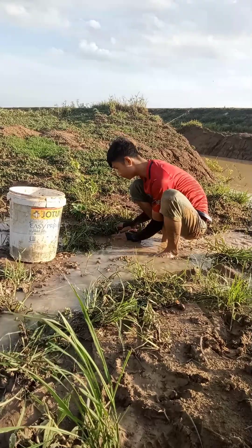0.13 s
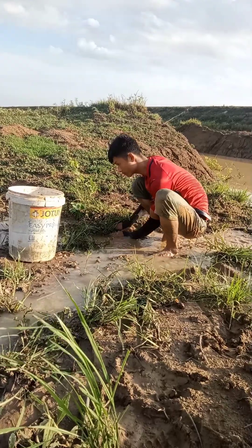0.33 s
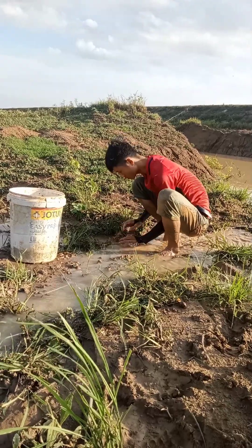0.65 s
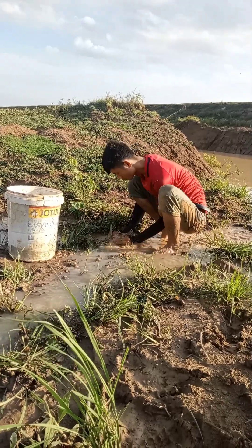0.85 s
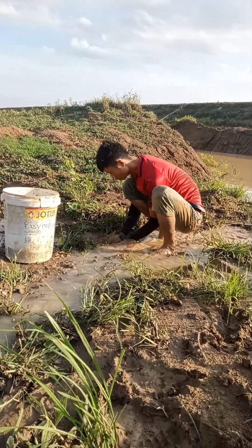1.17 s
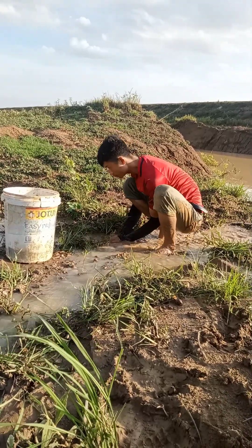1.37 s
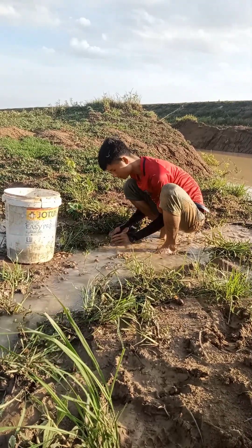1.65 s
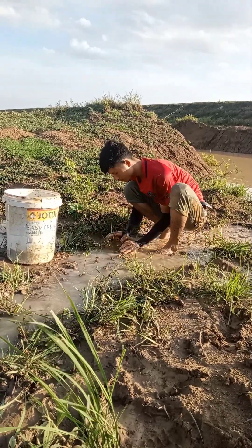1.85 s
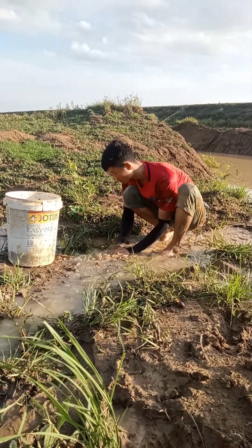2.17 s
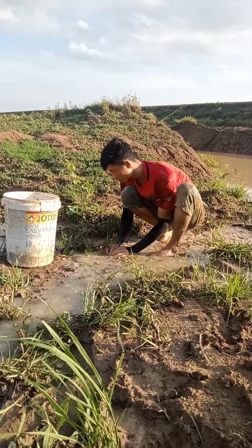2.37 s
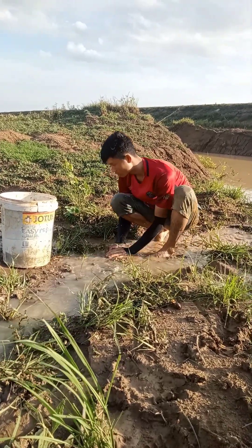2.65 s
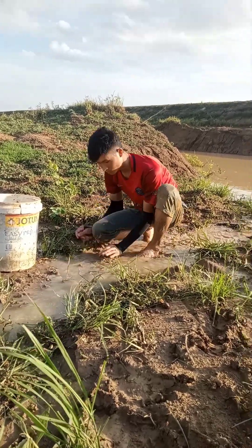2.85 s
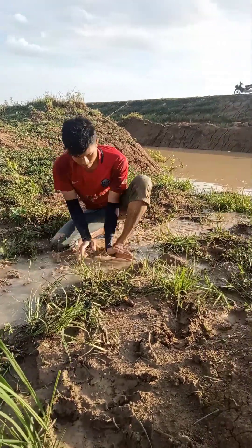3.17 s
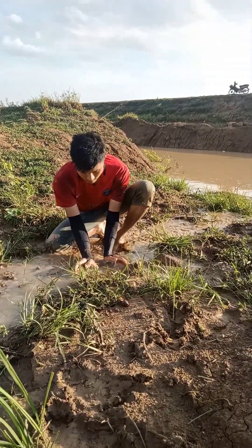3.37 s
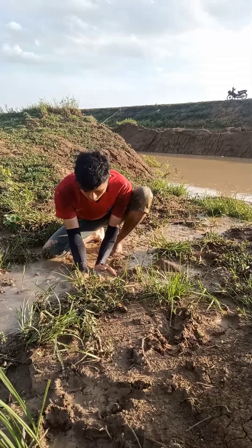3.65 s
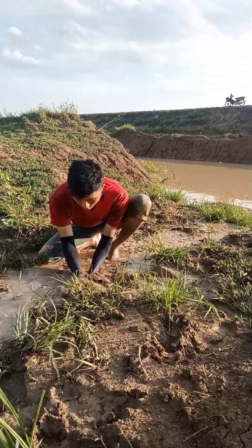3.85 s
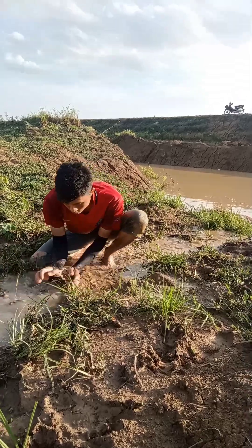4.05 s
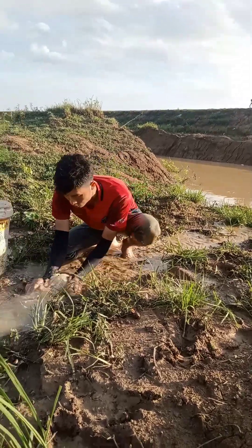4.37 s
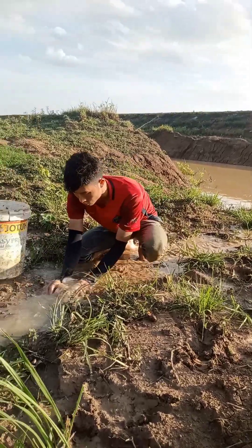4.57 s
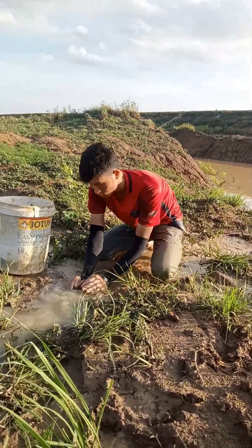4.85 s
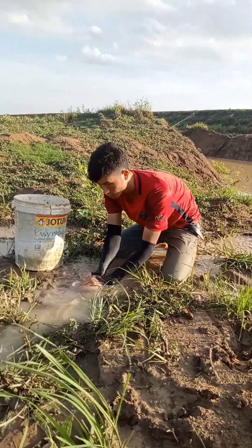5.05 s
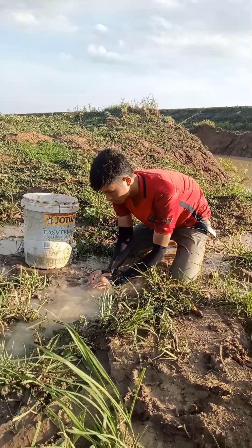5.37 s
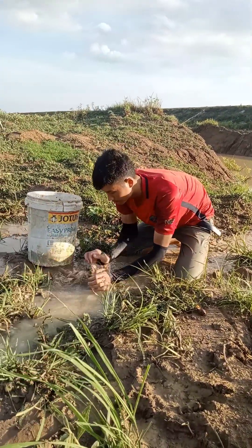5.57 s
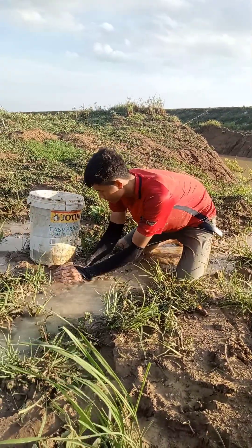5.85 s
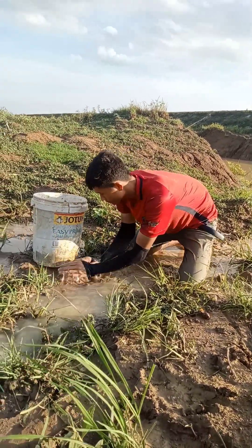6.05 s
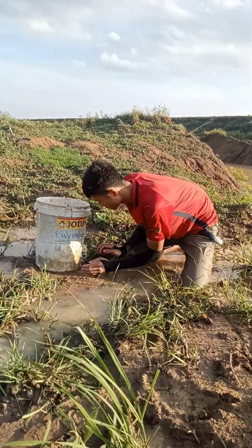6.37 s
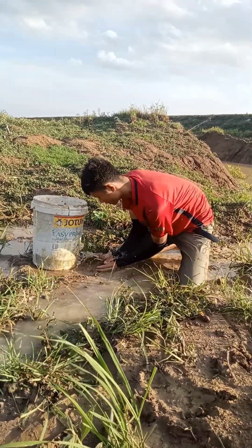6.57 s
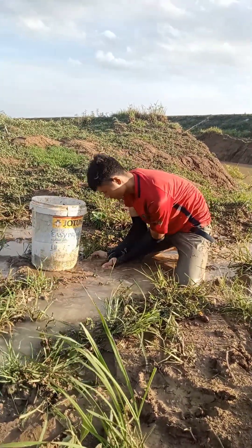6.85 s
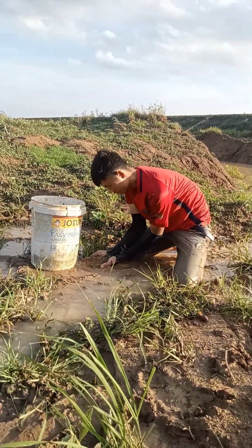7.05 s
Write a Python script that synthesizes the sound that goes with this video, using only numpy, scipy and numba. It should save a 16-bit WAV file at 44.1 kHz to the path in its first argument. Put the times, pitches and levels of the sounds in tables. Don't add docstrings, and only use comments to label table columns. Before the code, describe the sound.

Hands slosh and scoop shallow muddy water with plinking drops and small slaps while gusts of wind thump against a bare microphone outdoors.

```python
import sys
import numpy as np
from scipy import signal
from scipy.fft import rfft, irfft, next_fast_len
from scipy.io import wavfile
from scipy.ndimage import uniform_filter1d, minimum_filter1d
from numba import njit

SR = 44100
rng = np.random.default_rng(int(sys.argv[2]) if len(sys.argv) > 2 else 0)


def master(y):
    cut = np.clip(np.atleast_2d(y).T, -1, 1)
    pcm = np.round(cut * 32767)
    wavfile.write(sys.argv[1], SR, pcm.astype(np.int16))


def invert_db(level):
    return 10 ** (np.asarray(level, dtype=float) / 20)


N = 318381


def level(x, db):
    return x * invert_db(db) / np.sqrt(np.mean(x ** 2))


def columns(table):
    return np.ascontiguousarray(np.transpose(table), float)


def curve(table):
    s, *values = np.transpose(table)
    return [np.interp(np.arange(N) / SR, s, v) for v in values]


def colour(x, table):
    hz, db = np.transpose(table)
    size = next_fast_len(N)
    f = np.arange(size // 2 + 1) * SR / size + 1
    gain = invert_db(np.interp(np.log(f), np.log(hz), db))
    return irfft(rfft(x, size) * gain, size)[:N]


def walk(rate_hz):
    hold = int(SR / rate_hz)
    steps = np.repeat(rng.standard_normal(N // hold + 1), hold)[:N]
    return uniform_filter1d(steps, hold) * np.sqrt(1.5)


def random_phase(count):
    return 2 * np.pi * rng.random(count)


@njit
def grains(s, hz, size, rise, fall, bend, glide, phase):
    y = np.zeros(N)
    for k in range(len(s)):
        first = max(int((s[k] - 3 * rise[k]) * SR), 0)
        last = min(int((s[k] + 7 ** (1 / bend) * fall[k]) * SR), N)
        for i in range(first, last):
            t = i / SR - s[k]
            e = (t / rise[k]) ** 2 if t < 0 else (t / fall[k]) ** bend
            angle = phase[k] + 2 * np.pi * hz[k] * t * (1 + glide[k] * t / 2)
            y[i] += size[k] * np.exp(-e) * np.sin(angle)
    return y


def lumps(s, db, rise_s, fall_s, bend=1.1):
    zero = 0 * s
    return grains(s, zero, invert_db(db), rise_s + zero, fall_s + zero, bend, zero, np.pi / 2 + zero)


def swarm(count, lo_hz, hi_hz, cycles, spread_db, glide, bend=0.56):
    when, pitch, length, rarity, slide, turn = rng.random((count, 6)).T
    hz = lo_hz * (hi_hz / lo_hz) ** pitch
    fall = cycles * (.5 + length) / hz
    rise = fall if bend > 1 else fall / 3
    size = invert_db(-spread_db * np.log(rarity + 0.0048)) * np.sqrt(hz)
    y = grains(when * N / SR, hz, size, rise, fall, bend, glide * slide / fall, 2 * np.pi * turn)
    return level(y, 0)


def split(x):
    # f/Hz, density/dB
    water = [(600, -9), (900, -7), (1300, -9.5), (2000, -1.5), (2500, -3.5), (3050, 2.5), (3700, -1),
             (4800, -14.5), (6000, -18.5), (7100, -17), (8100, -18.5), (9400, -11.5), (11500, -21),
             (15500, -26), (16000, -70)]
    mix = colour(x, water)
    body = colour(mix, [(4500, 1.0), (5500, -88)])
    return level(body, 0), level(mix - body, 0)


def insect():
    buzz = (.335, .145, 8150, -62.5)
    end_s, length_s, hz, db = buzz
    period_s = .29
    t = np.arange(N) / SR
    left_s = (end_s - t) % period_s
    gate = np.clip(np.minimum(left_s, length_s - left_s) * 100, 0, 1) * (t < end_s)
    return invert_db(db) * gate * (1.2 + walk(700)) * np.sin(2 * np.pi * hz * t)


def wind_bed(gust_db):
    slow = swarm(count=1500, lo_hz=37.0, hi_hz=217, cycles=0.68, spread_db=2.5, glide=0.038, bend=1.64)
    slow = colour(slow, [(30, -50), (60, -8.0), (100, 4.5), (300, -8.0)])
    fast = swarm(count=2500, lo_hz=158.0, hi_hz=890, cycles=0.56, spread_db=3.5, glide=0.073, bend=1.1)
    fast = colour(fast, [(150, -2.5), (350, -14.0), (900, -59), (1500, -54)])
    mix = level(slow, -1.7) + level(fast, -8) * invert_db(1.02 * (gust_db + 27))
    return invert_db(gust_db + 2.0 * walk(28)) * mix


def ripples():
    # t/s, level/dB, f/Hz
    small = [(0.111, -28.0, 129), (0.706, -24, 149), (0.733, -23.5, 140), (0.922, -25.0, 170),
             (1.068, -21, 140), (1.379, -26, 139), (1.427, -28, 119), (1.492, -22, 109), (1.606, -31, 120),
             (1.696, -23, 150), (1.745, -20, 150), (1.762, -17, 160), (1.782, -34, 120),
             (1.919, -22.5, 130), (1.942, -22, 130), (1.97, -15.5, 150), (2.035, -19, 150),
             (2.058, -16.5, 171), (2.087, -23, 140), (2.137, -21, 180), (2.18, -19, 160), (2.299, -20, 160),
             (2.315, -24.0, 140), (2.334, -14.5, 140), (2.373, -18, 130), (2.389, -18.0, 170),
             (2.437, -23, 140), (2.454, -16.5, 170), (2.573, -5, 212), (2.59, -10, 180),
             (2.685, -26.0, 130), (2.714, -28, 180), (3.429, -34, 110), (3.473, -28, 120),
             (3.517, -24, 130), (3.683, -26, 130), (3.782, -20, 130), (3.817, -23, 119),
             (3.868, -19.5, 118), (3.892, -31, 130), (4.039, -19, 140), (4.092, -21, 159),
             (4.378, -22, 130), (4.519, -29.0, 170), (4.633, -22, 120), (4.701, -29.5, 190),
             (4.742, -25.5, 129), (5.111, -11, 157), (5.152, -21, 140), (5.495, -19.5, 170),
             (5.602, -29, 110), (5.662, -9, 180), (5.713, -17, 160), (5.803, -18.5, 130), (5.873, -12, 140),
             (6.319, -29, 150), (6.749, -29, 160), (7.052, -23, 150)]
    s, db, hz = columns(small)
    rise = 0.8 / hz
    return grains(s, hz, invert_db(db), rise, 1.14 * rise, 2.2, 0 * s, random_phase(len(s)))


def snaps():
    # t/s, level/dB, f/Hz
    fronts = [(1.1966, -25.0, 460), (1.4002, -24.5, 444), (1.5845, -28.5, 530), (1.6302, -22, 510),
              (1.6629, -23, 476), (1.7268, -22, 420), (1.8437, -28, 500), (2.0635, -31, 480),
              (2.2139, -17.5, 477), (2.2262, -14.5, 456), (2.2782, -29.5, 480), (2.3332, -26, 460),
              (2.3479, -27, 470), (2.3565, -22, 490), (2.3867, -28, 510), (2.4552, -29.0, 470),
              (2.5163, -16, 460), (2.5254, -22, 470), (2.539, -13, 590), (2.5657, -10, 560),
              (2.5789, -18, 490), (2.6114, -20.5, 480), (4.1699, -26, 466), (4.211, -28.5, 570),
              (4.2378, -22, 480), (4.4088, -29.5, 580), (4.5673, -27, 494), (5.129, -25.0, 510),
              (5.5172, -29, 520), (5.5537, -32, 450), (5.6193, -25.5, 480), (5.6289, -25.0, 500),
              (5.6516, -27.0, 480), (5.6836, -17.5, 540), (1.0465, -23, 410), (5.8663, -20.0, 487),
              (5.8888, -24, 460), (5.9014, -31, 530), (5.9093, -19.5, 577), (5.9194, -23, 464),
              (6.0286, -29.5, 510), (6.0771, -24, 480), (6.2434, -23.5, 480), (6.4006, -28.5, 470),
              (6.5118, -24, 540), (6.523, -17.5, 480), (6.5322, -22.5, 490), (6.5459, -28, 530),
              (6.7311, -27.5, 465), (7.1587, -18, 457), (7.1983, -24, 460)]
    s, db, hz = columns(fronts)
    return grains(s, 0.86 * hz, invert_db(db + 4), 0.54 / hz, 1 / hz, 1.67, -.08 * hz, random_phase(len(s)))


def eddies(gust_db, churn):
    # t/s, level/dB,
    # f/Hz, length/ms
    big_eddies = [(.113, -29.5, 121, 18), (.45, -34, 100, 27), (.706, -20.5, 140, 18), (.811, -25, 139, 31),
                  (.905, -14.5, 205, 10.6), (1.04, -16, 163, 20), (1.131, -11.5, 172, 6.7),
                  (1.195, -13, 171, 18), (1.344, -17, 210, 5.1), (1.401, -14, 138, 40),
                  (1.491, -21.5, 103, 9.5), (1.574, -17.5, 155, 24), (1.632, -11.5, 202, 16),
                  (1.668, -14.5, 141, 22), (1.728, -11.5, 199, 9.3), (1.896, -16, 133, 51),
                  (1.969, -26, 142, 15), (2.005, -18, 169, 21), (2.059, -15, 177, 24),
                  (2.181, -19.5, 170, 20), (2.211, -9.5, 198, 7.2), (2.23, -9.5, 192, 10),
                  (2.278, -17, 242, 8.6), (2.351, -8, 188, 21), (2.414, -12.5, 190, 10),
                  (2.454, -15, 168, 7.6), (2.547, -10, 207, 16), (2.573, -8, 221, 12),
                  (2.611, -15, 245, 28), (2.517, -14.5, 208, 14),
                  (2.671, -25.5, 214, 39), (2.771, -27, 194, 20), (1.263, -21, 133, 16),
                   (2.885, -33, 230, 15), (1.855, -16, 150, 6.4), (2.389, -17.5, 183, 5.4),
                   (4.377, -19.5, 121, 18), (1.212, -14.5, 208, 13), (5.1, -16.5, 148, 22),
                   (3.32, -41, 121, 33), (3.428, -34, 106, 13), (3.993, -28, 161, 15),
                   (2.96, -30.5, 124, 8.1), (3.195, -25.5, 107, 16), (3.53, -24.5, 105, 35),
                   (3.645, -28, 150, 9.9), (3.782, -22, 126, 15), (3.869, -27, 117, 7.8),
                   (4.056, -20, 134, 35), (4.172, -16.5, 182, 15), (4.246, -13, 179, 38),
                   (4.319, -13.5, 162, 21), (4.411, -19, 134, 17), (4.568, -12, 195, 7),
                   (4.675, -22, 145, 15), (4.74, -21.5, 116, 15), (5.131, -10.5, 158, 20),
                  (5.34, -18, 122, 16), (5.395, -19.5, 143, 42), (5.516, -13.5, 265, 20),
                 (5.559, -17.5, 190, 16), (5.621, -14.5, 173, 7.9), (5.661, -10, 168, 18),
                 (5.686, -6, 170, 16), (5.764, -11, 141, 14), (5.841, -17.5, 201, 25),
                 (5.889, -13, 217, 7.2), (5.911, -8.5, 238, 28.5), (6.031, -16.5, 178, 5.1),
                 (6.084, -13.5, 164, 19), (6.227, -10.5, 173, 24), (6.258, -10.5, 110, 10),
                 (6.305, -16.5, 139, 9.8), (6.403, -16, 198, 22), (6.439, -21, 125, 18),
                 (6.523, -12, 203, 17.3), (6.54, -12.5, 140, 22), (6.564, -22, 171, 24),
                 (6.733, -22.5, 203, 14), (6.766, -19, 132, 15), (6.804, -17, 116, 40),
                 (6.828, -18, 178, 8.6), (6.931, -19, 137, 10.3), (7.069, -16, 179, 4.8),
                 (7.16, -11, 170, 11), (7.205, -17, 230, 24)]
    s, db, hz, ms = columns(big_eddies)
    half = np.clip(ms, 6, 40) * 0.00051
    core = np.minimum(half, 1.04 / hz)
    slide, turn, lag, wake_turn, scatter = rng.random((len(s), 5)).T
    thump = grains(s, hz, invert_db(db), core, 1.3 * core, 3.4, (slide - .5) * .5 / core, 2 * np.pi * turn)
    wake = grains(s + lag * half, hz * .55, invert_db(db - 10), 1.6 * core, 2.2 * core, 2., 0 * s,
                  2 * np.pi * wake_turn)
    swirl = churn * lumps(s, db - 8.5, 1.86 * half, 1.4 * half)
    flutter_db = -17.5 + 12 * np.log2(hz / 160) + (scatter - .5)
    flutter_db = flutter_db + 0.41 * (gust_db[(s * SR).astype(int)] + 30.5)
    flutter = colour(rng.standard_normal(N),
                     [(180, -21.0), (320, 4.5), (600, -16.0), (900, -32.0), (1300, -69)])
    edge = level(flutter, 0) * lumps(s, db + flutter_db, 1.61 * half, 1.1 * half)
    return thump + wake + swirl + edge


def wind():
    # t/s, level/dB
    gusts = [(0, -58), (.25, -47), (.57, -62), (.72, -36.5), (1.15, -28.5), (2.44, -26), (2.56, -22),
             (2.72, -33.5), (3.0, -48.5), (3.26, -36), (4.08, -32.5), (4.25, -25.5), (4.67, -31),
             (4.9, -49), (5.27, -38.5), (5.64, -24), (6.05, -34), (7.22, -34)]
    gust_db, = curve(gusts)
    churn = colour(rng.standard_normal(N),
                   [(30, -19.5), (80, 7.0), (170, 2.0), (300, -2.0), (500, -47.0)])
    churn = level(churn, 0)
    floor = invert_db(-58) * colour(churn, [(100, 0), (190, -16)])
    flow = wind_bed(gust_db) + floor + eddies(gust_db, churn) + snaps() + ripples()
    return colour(flow, [(25, -11), (55, 0.5), (1100, 1.5), (1800, -50)])


def ticks():
    # t/s, level/dB, f/Hz
    bursts = [(0.1874, -31, 10300), (5.184, -37, 4600), (0.4625, -38, 6000), (0.4841, -37, 8800),
              (1.0289, -37, 7000), (1.2382, -37, 9300), (1.2606, -38, 9500), (1.3412, -27, 12000),
              (1.3828, -37, 9500), (1.4435, -37, 9600), (1.7208, -37, 8700), (2.0079, -34, 11100),
              (2.075, -37, 7300), (2.1351, -37, 6460), (2.1795, -35, 8200), (3.0007, -40, 9200),
              (3.0251, -40, 9500), (3.0843, -40, 6700), (3.2151, -36.5, 9900), (3.2356, -26.0, 10700),
              (3.2568, -27, 10000), (3.2634, -35, 9900), (3.3196, -38, 8600), (3.375, -35, 5950),
              (3.4501, -38.0, 8600), (3.4731, -37, 8300), (3.4892, -27, 11400), (3.6717, -35, 9700),
              (4.177, -36, 11500), (3.9789, -38, 9900), (4.1255, -32, 7350), (4.1775, -35, 5300),
              (4.547, -36, 10000), (4.2382, -35, 9100), (4.2509, -41, 6100), (4.3536, -31.5, 8400),
              (4.4204, -36, 8160), (4.9482, -25.5, 10200), (5.008, -38, 9600), (5.0318, -38.0, 7700),
              (5.0643, -35, 9100), (5.1301, -38.5, 8800), (5.326, -37, 5600), (5.6493, -33, 8900),
              (5.7534, -30, 8950), (6.2691, -32, 9350), (6.4402, -35.0, 6300), (6.5094, -28.5, 9200),
              (6.5207, -37, 9600), (6.5949, -34, 8460), (6.6379, -35, 8500), (7.0017, -31, 9000)]
    s, db, hz = columns(bursts)
    fall = 6 / hz
    ring = grains(s, hz, invert_db(db - 0.4), 0.27 * fall, fall, 1.1, 0 * s, random_phase(len(s)))
    _, spray = split(rng.standard_normal(N))
    return ring + spray * lumps(s, db - 13, .0006, .0018, bend=.9)


def drops():
    # t/s, level/dB, f/Hz, spray/dB
    single = [(0.4065, -38, 1500, -23), (0.644, -29.5, 2900, -35.5), (0.8554, -5.5, 3130, -36),
              (0.942, -34, 1600, -23), (1.0578, -27, 3020, -24), (1.3112, -34, 2760, -14),
              (1.4208, -25.5, 2860, -25), (1.628, -32, 3430, -27), (1.9457, -20, 5200, -17),
              (2.3224, -35.5, 2820, -28), (3.0105, -26, 2280, -32), (3.0825, -29.5, 2190, -23),
              (3.2536, -21.5, 3500, -29), (3.2686, -26, 3030, -22), (3.567, -26, 3070, -37),
              (4.1182, -26.5, 3830, -29), (4.3547, -20, 2060, -26), (4.409, -29.5, 2700, -20),
              (4.5199, -25.5, 2220, -31), (4.6297, -31.5, 2200, -27), (4.946, -27.5, 4000, -14),
              (4.9608, -31, 3500, -10), (5.583, -22.5, 2460, -26), (5.7585, -19.5, 3920, -19),
              (5.776, -20, 2980, -43), (5.8535, -30, 1540, -19), (5.911, -28, 3060, -30),
              (6.5127, -26.5, 4050, -24), (6.894, -26.5, 2950, -22), (7.0683, -36, 1830, -24)]
    # t/s, level/dB, length/ms, spray/dB
    splashes = [(.19, -44, 9.4, -1.5), (0.841, -37, 12, -11), (0.859, -48.5, 4.7, 16.5),
                (1.942, -33, 7, -1), (1.965, -37.5, 15, -14), (2.96, -46, 18, -3), (5.03, -45, 21, -3),
                (3.02, -38.5, 47, -4.5), (3.257, -37.5, 41, -5), (3.465, -40, 20, -5), (4.122, -38, 16, -6),
                (4.369, -32, 21, -11), (4.955, -33, 12, -4.5), (5.755, -31, 14, -1.5),
                (6.519, -35.5, 22, -10), (4.089, -39, 5, -3), (3.995, -36.5, 24, -11),
                (3.4255, -37, 4.5, -8)]
    s, db, hz, spray_db = columns(single)
    fall = 4.5 / hz
    slide, turn = rng.random((len(s), 2)).T
    ring = grains(s, hz, invert_db(db + 2.5), .35 * fall, 1.2 * fall, 1.25, .015 * slide / fall,
                  2 * np.pi * turn)
    tail = lumps(s + 0.0039, db - 14.5, 0.0015, 0.0032, bend=1.)
    mist = lumps(s, db + spray_db + 4, .0007, .0016, bend=1.)

    s, db, ms, spray_db = columns(splashes)
    half = np.clip(ms, 4, 40) / 1000
    ragged = level(invert_db(3.6 * walk(250)), 0)
    tail = tail + ragged * lumps(s, db, 0.95 * half, half, bend=0.71)
    mist = mist + ragged * lumps(s, db + spray_db, 0.61 * half, 0.75 * half, bend=0.85)

    body, spray = split(rng.standard_normal(N) * invert_db(2.6 * walk(600)))
    return ring + tail * body + mist * spray


def plops():
    # t/s, level/dB, f/Hz
    gulps = [(.293, -39, 550), (.476, -37, 630), (.569, -34, 825), (.729, -32.5, 1040), (2.157, -23.5, 495),
             (2.998, -35, 1030), (3.068, -31, 765), (3.794, -30, 917), (4.516, -30.5, 715),
             (5.586, -26, 1080), (5.882, -33, 1500), (5.0738, -29, 3530), (5.715, -37, 1700),
             (5.848, -29, 3650), (5.866, -34, 1550), (3.945, -37, 1800), (3.847, -36, 840),
             (1.963, -31, 2200), (6.867, -24, 562), (6.912, -35, 1000), (6.964, -32, 560), (6.71, -33, 560),
             (5.41, -37, 1060), (6.905, -36, 1490), (7.066, -32, 980)]
    s, db, hz = columns(gulps)
    fall = 3.3 / hz
    return grains(s, hz, invert_db(db), .35 * fall, fall, 1.3, .06 / fall, 0 * s)


def slaps():
    # t/s, level/dB, centre f/Hz
    hits = [(4.2529, -21, 2770), (0.85, -29, 1300), (7.068, -31, 1210), (1.42, -26, 2600),
            (1.9415, -16, 3020), (1.945, -11.5, 4270), (1.9465, -20, 3600), (3.9778, -32, 3600),
            (3.065, -23, 1230), (4.4196, -25, 3220), (6.56, -24, 3020), (4.3535, -13, 2000),
            (4.518, -31, 1170), (5.389, -28, 3330), (5.582, -21, 1520), (5.632, -24.5, 2400),
            (5.662, -26.5, 2980), (5.736, -29, 2700), (5.747, -29, 3000), (5.836, -36, 2100),
            (5.922, -28, 3000), (6.356, -25, 3440), (6.667, -23, 2410), (1.713, -26, 3180),
            (3.655, -24.5, 2160), (4.802, -26, 2220), (5.0394, -28, 4200), (6.903, -24, 2200)]
    s, db, hz = columns(hits)
    fall = 1.2 / hz
    return grains(s, hz, invert_db(db), 0.71 * fall, fall, 0.8, 0 * s, random_phase(len(s)))


def slosh():
    # t/s, level/dB
    effort = [(0, -44), (.6, -43.5), (1.37, -43), (1.6, -44.5), (2.15, -43.5), (2.54, -46.5), (2.75, -50.5),
              (2.93, -45.5), (3.1, -40.5), (3.35, -39.5), (3.7, -43.5), (4.1, -41.5), (4.45, -41),
              (4.68, -44.5), (4.9, -42.5), (5.27, -45.5), (5.6, -43.5), (7.22, -43.5)]
    water_db, = curve(effort)
    spray_db = -12 + 0.12 * (water_db + 43.0)
    burble_db = -49.5 + 0.62 * (water_db + 43) + 3.5 * walk(5)

    fizz = swarm(count=11000, lo_hz=894.0, hi_hz=15490, cycles=4.8, spread_db=3.0, glide=0.019)
    fizz = colour(fizz, [(900, 12.4), (15000, 17)])
    pops_per_s = 450
    pops = rng.random(N) < pops_per_s / SR
    pops = pops * invert_db(3.5 * np.minimum(rng.exponential(size=N), 3.8))
    crackle = signal.filtfilt([1], [1, -.92], pops) * rng.standard_normal(N)
    crackle = level(crackle, -6.5) * invert_db(0.35 * (water_db + 41.5))
    hiss = rng.standard_normal(N) * invert_db(1.14 * walk(30))

    body, spray = split(level(fizz, -1.7) + crackle + level(hiss, -4.5))
    body = body * invert_db(1.41 * walk(12))
    spray = spray * invert_db(1.4 * walk(36))
    burble = swarm(count=2200, lo_hz=377.5, hi_hz=1254, cycles=2.66, spread_db=3.5, glide=0.081)
    burble = level(colour(burble, [(250, -6), (450, 5.0), (800, 1.0), (1300, -14.5)]), 0)
    return invert_db(water_db + 0.5) * (body + invert_db(spray_db) * spray) + invert_db(burble_db) * burble


def scene():
    water = slosh() + drops() + plops() + slaps()
    bounce = np.roll(water, int(0.0043 * SR))
    return (water + invert_db(-24.5) * bounce + wind() + insect() + ticks())[None]


def roll_off(x):
    return signal.sosfilt(signal.butter(12, 15800, fs=SR, output="sos"), x)


def record(dry):
    hold = int(.012 * SR)
    gain = np.minimum(1, .95 / (np.abs(dry) + 1e-9))
    gain = uniform_filter1d(minimum_filter1d(gain, hold), hold)
    return roll_off(np.tanh(0.37 * gain * dry) / 0.42)


dry = scene()
out = record(dry)
master(out)
```